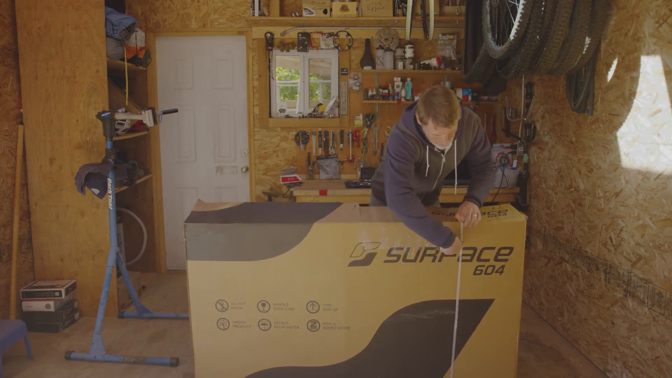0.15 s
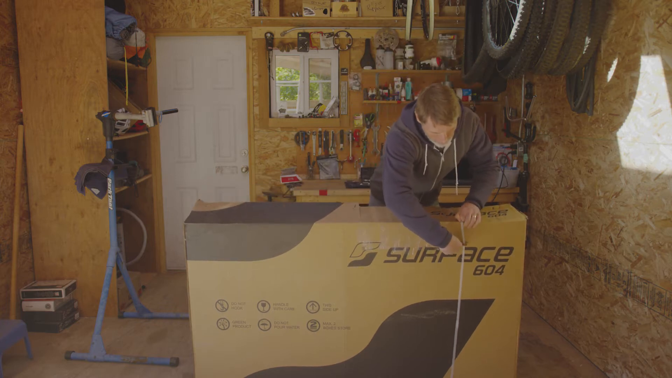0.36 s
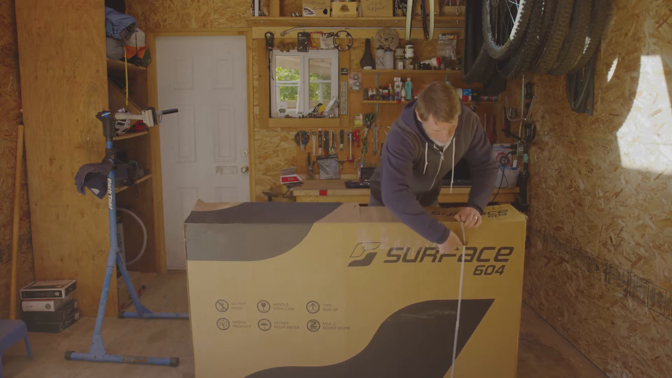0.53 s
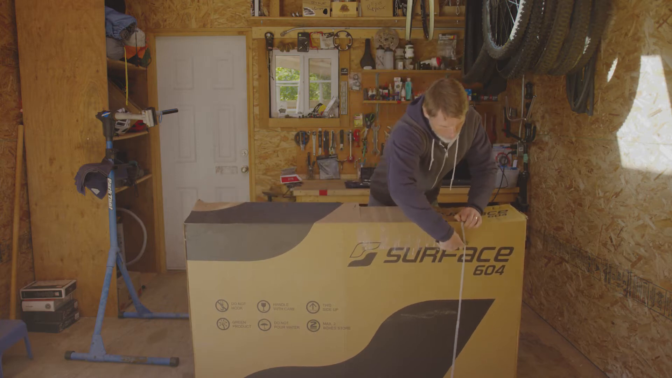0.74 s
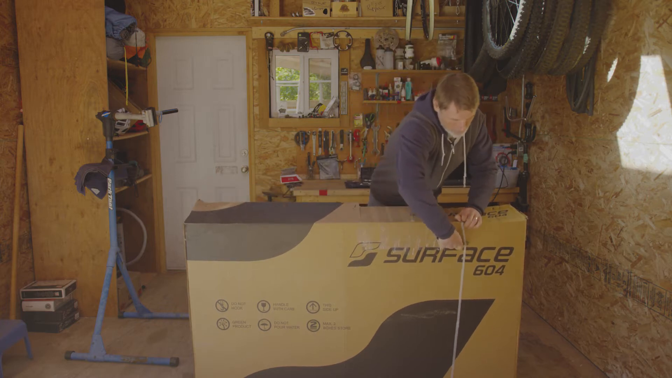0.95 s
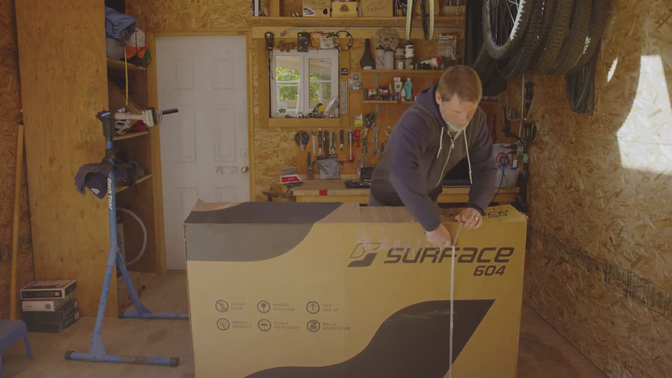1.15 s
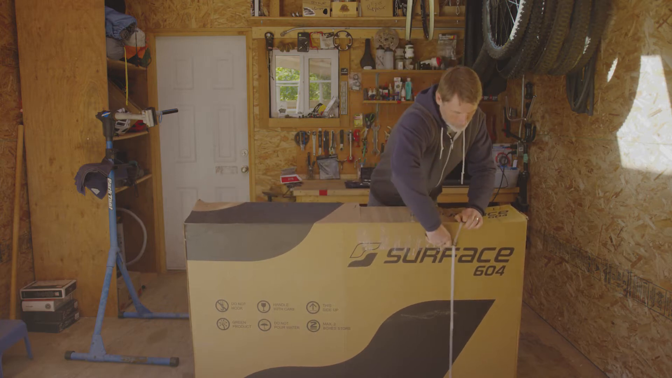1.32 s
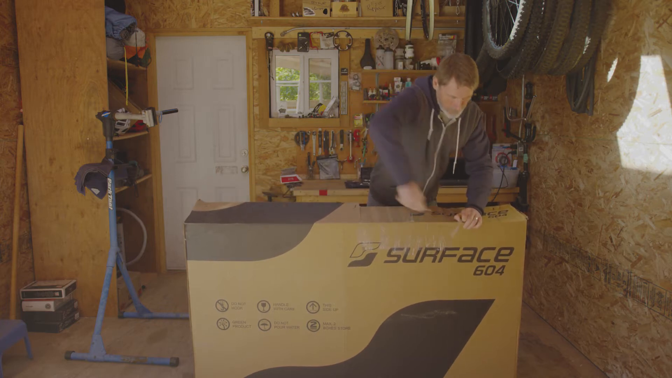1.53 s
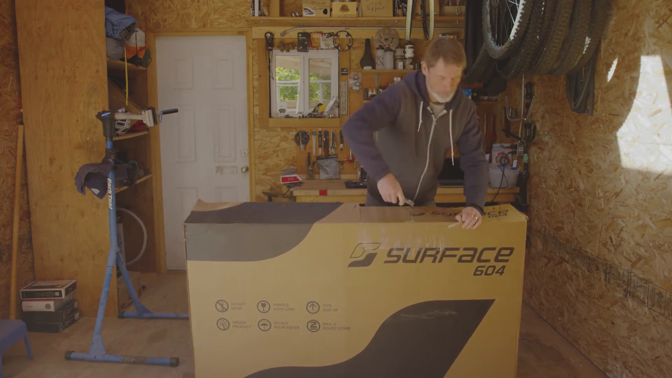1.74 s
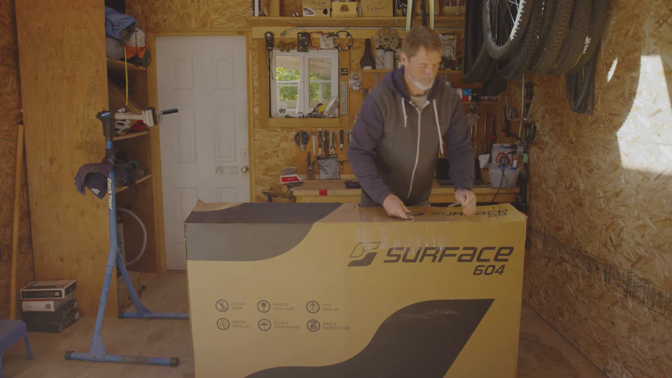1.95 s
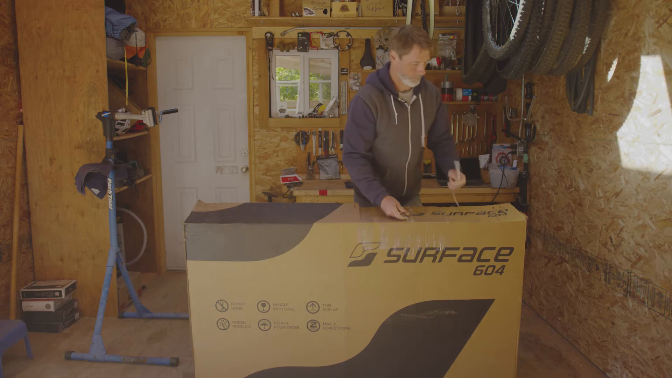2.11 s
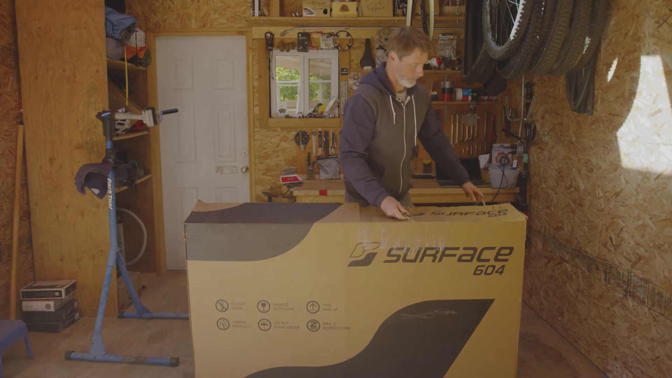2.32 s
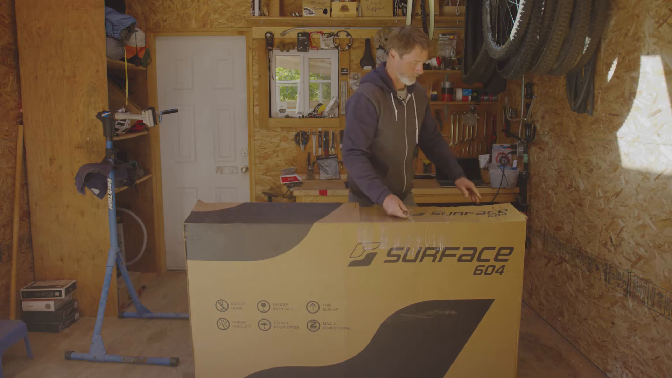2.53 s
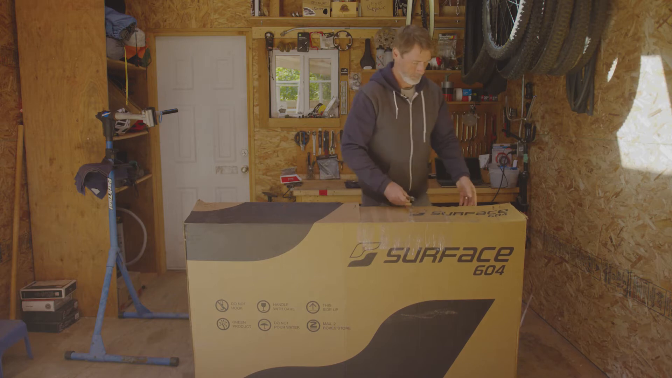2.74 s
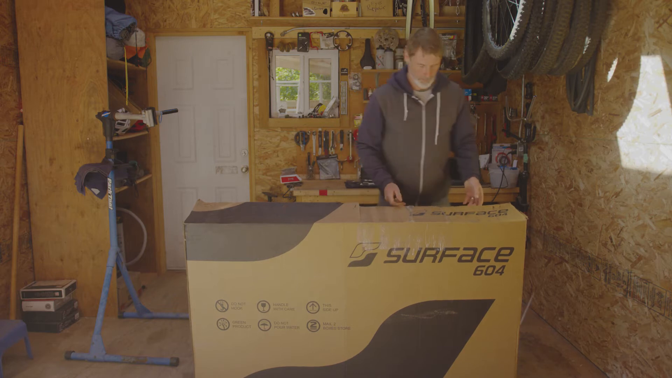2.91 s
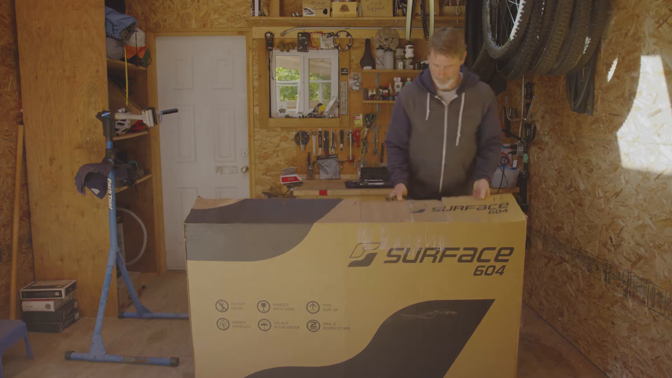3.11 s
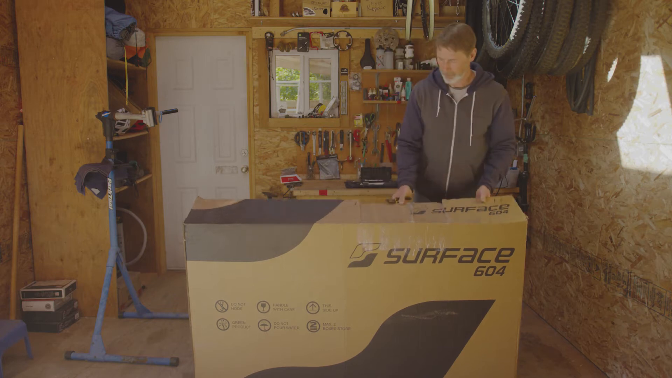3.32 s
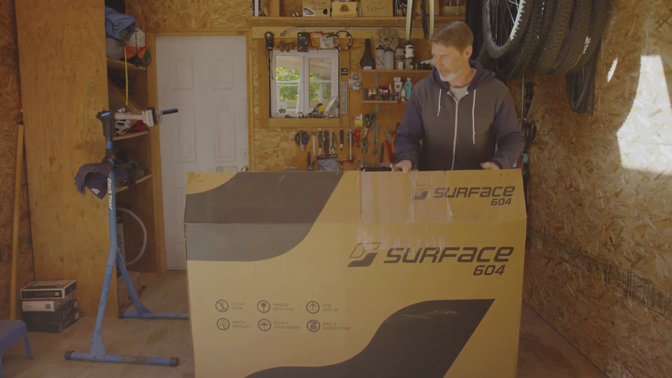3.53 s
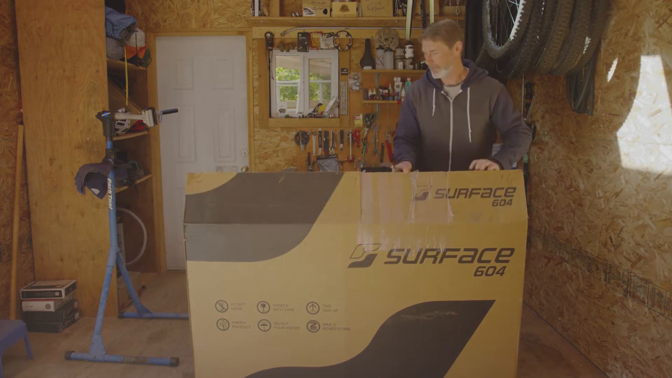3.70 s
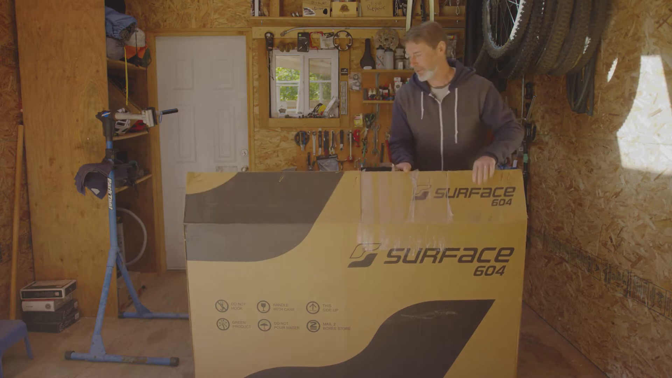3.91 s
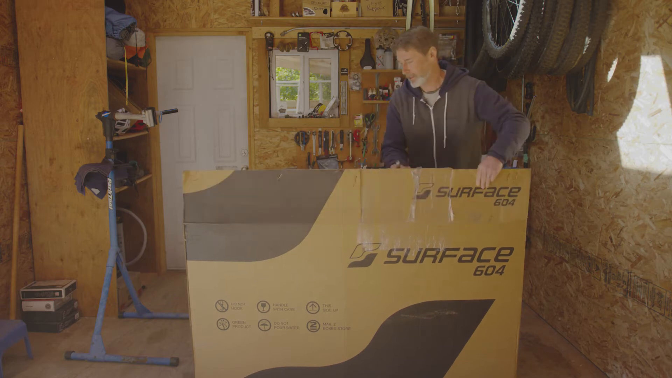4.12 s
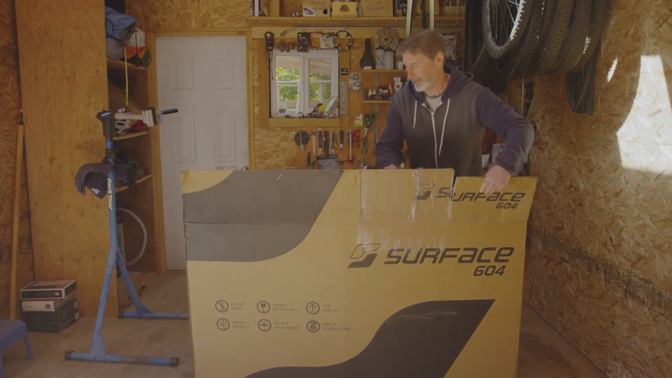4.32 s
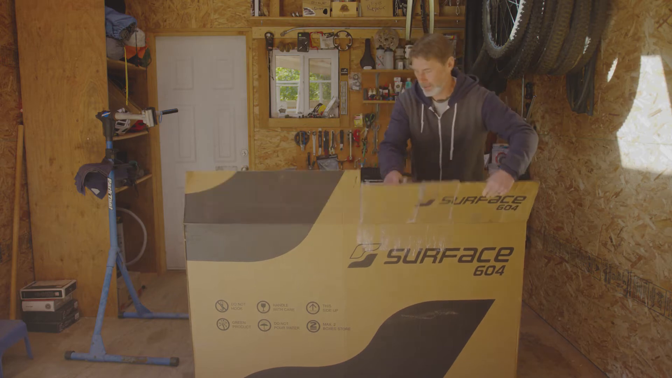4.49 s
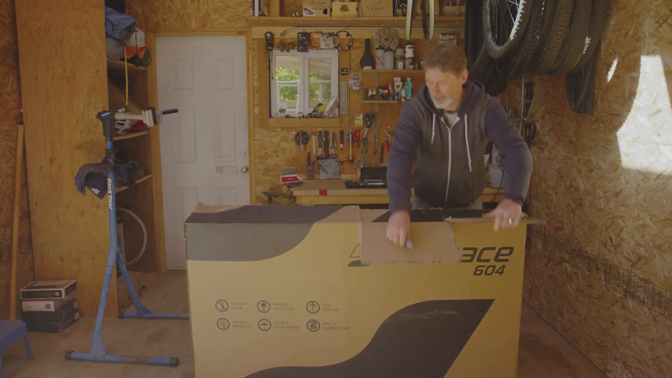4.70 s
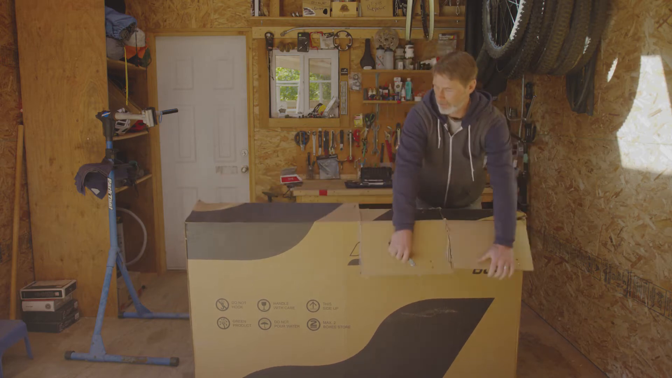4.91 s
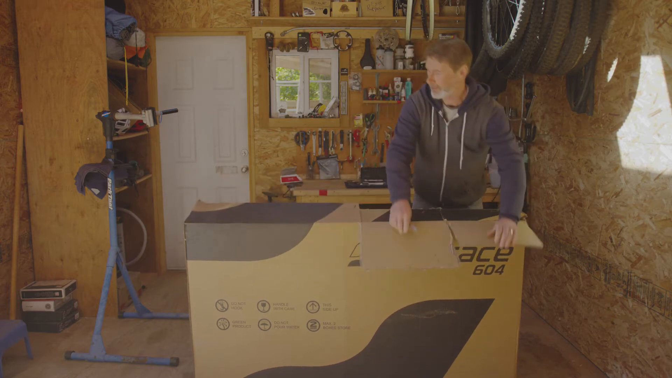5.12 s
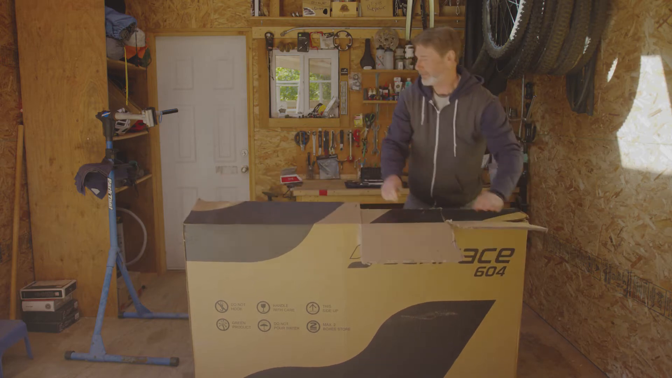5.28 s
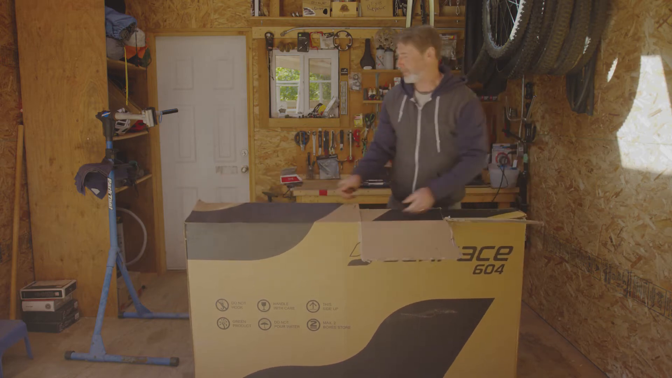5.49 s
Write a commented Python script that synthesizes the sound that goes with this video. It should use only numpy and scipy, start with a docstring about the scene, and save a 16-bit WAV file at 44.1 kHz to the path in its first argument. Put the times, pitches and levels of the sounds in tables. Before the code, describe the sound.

Close in a small wooden workshop, hands bump a large hollow cardboard box and steel snips click faintly. One bright snip, then the tight plastic strap lets go with a sharp crack, hollow thud and short hiss. After light rustling, tape and card rip in crackling bursts, and flaps are slapped open with papery knocks. Short room tail, quiet low room tone.

```python
"""A big hollow cardboard box is knocked and torn open by hand, heard close in a small wooden workshop.
Every knock rings the damped modes of the box; noise bursts make the cracks of strap, tape and card edge.
Snips click on short steel modes as they cut the tight plastic strap, which cracks and whips away.
Sliding and scraping are grainy or smooth noise, coloured and partly fed into the box.
Blows, cracks and clicks stir a short room tail; a quiet room tone lies under it all."""
import sys
import numpy as np
from scipy import signal
from scipy.fft import rfft, irfft, next_fast_len
from scipy.io import wavfile
from scipy.ndimage import uniform_filter1d

SR = 44100
rng = np.random.default_rng(int(sys.argv[2]) if len(sys.argv) > 2 else 0)


def natural_amplitude(level_db):
    """Convert a level in decibels to a linear amplitude factor, elementwise."""
    exponent = np.asarray(level_db, float) / 20
    return 10 ** exponent


def materialize(psi):
    """Save the field psi as 16-bit PCM at rate SR to the path in sys.argv[1].

    A 1-D psi becomes a single channel; in a 2-D psi each row is a channel.
    """
    bounded = np.clip(np.atleast_2d(psi).T, -1, 1)
    quanta = np.round(bounded * 32767).astype(np.int16)
    wavfile.write(sys.argv[1], SR, quanta)


N = 244742

# Modes of the hollow box. Each row: pitch in Hz, gain in dB, time to fall by 60 dB in seconds.
BOX_MODES = [(81.5, -18, 0.11), (113, 1, 0.082), (163.5, -3, 0.089), (215, -6.5, 0.083),
             (254.4, -1.5, 0.084), (303, 2.5, 0.035), (381.8, -0.5, 0.059), (456.6, 2.5, 0.033),
             (542.5, 1, 0.042), (612, 2, 0.035), (695.4, 6, 0.034), (780, 0, 0.04), (842, 1.5, 0.015),
             (920, 2, 0.017), (1072, 0.5, 0.028), (1250, 2, 0.016), (1545, -2.5, 0.014),
             (1870, -9.5, 0.012)]
# Spectrum of rubbed card. Each row: frequency in Hz, relative density in dB per Hz.
CARD_SPECTRUM = [(410, -32.5), (700, -30.5), (852, -2.5), (1680, -7.5), (4150, 0.5), (4990, -7),
                 (7790, -1.5), (14400, -4.5), (16000, -17.5)]


def unit(x):
    """Scale to rms 1."""
    return x / np.sqrt(np.mean(x ** 2))


def colour(x, points):
    """Filter by an outline of (Hz, dB) points, joined along log frequency."""
    hz, db = np.transpose(points)
    size = next_fast_len(len(x))
    f = np.maximum(np.fft.rfftfreq(size, 1 / SR), 1)
    gain = natural_amplitude(np.interp(np.log(f), np.log(hz), db))
    return irfft(rfft(x, size) * gain, size)[:len(x)]


def band(x, hz, octaves):
    """Band-pass of the given width round hz, scaled to rms 1."""
    half = 2 ** (octaves / 2)
    edges = np.clip([hz / half, hz * half], 20, .45 * SR)
    return unit(signal.sosfilt(signal.butter(2, edges, "band", fs=SR, output="sos"), x))


def ring(x, hz, t60):
    """One damped mode driven by x, falling 60 dB in t60 seconds."""
    pole = np.exp(2j * np.pi * hz / SR - np.log(1000) / (t60 * SR))
    return signal.lfilter([1], [1, -pole], x).imag


def walk(rate):
    """Random levels of spread 1, gliding to a new one every 1 / rate seconds."""
    hold = int(SR / rate)
    steps = np.repeat(rng.standard_normal(N // hold + 1), hold)
    return unit(uniform_filter1d(steps, hold)[:N])


def add(out, s, x):
    """Mix a sound in at time s."""
    i = int(s * SR)
    out[i:i + len(x)] += x[:N - i]


def grains(rate, spread_db):
    """Stick-slip ticks of very uneven size, each a millisecond puff of noise, over steady friction noise."""
    size_db = spread_db * np.minimum(rng.exponential(size=N), 3.5)
    ticks = (rng.random(N) < rate / SR) * natural_amplitude(size_db)
    puffs = signal.lfilter([1], [1, -np.exp(-1 / (.0012 * SR))], ticks)
    return (unit(puffs) + 1.3) * rng.standard_normal(N)


def shaken_box(spread_db):
    """The box modes fed by rough, continuous contact; light rubbing hardly moves the largest walls."""
    shake = grains(250., spread_db)
    hum = np.zeros(N)
    for hz, gain_db, t60 in BOX_MODES:
        tilt_db = -7.0 * abs(np.log2(hz / 230))  # modes away from 230 Hz are weaker
        hum += natural_amplitude(gain_db + tilt_db + 4.7 * walk(15)) * unit(ring(shake, hz, t60))
    return unit(signal.sosfilt(signal.butter(2, 90, "high", fs=SR, output="sos"), hum))


def knocks():
    """A short push and a fading rattle ring the modes near the struck panel; soft blows skip high ones."""
    # Each row: start in seconds, peak in dB, pitch of the struck panel in Hz,
    # softness in dB lost per octave above that pitch.
    blow_table = [(0.0, -30.5, 241, 6.5), (0.136, -48.5, 221, 10), (0.191, -51.5, 226, 9),
                  (0.488, -43.5, 716, 32), (0.815, -43.5, 260, 11), (0.852, -37.5, 283, 9),
                  (0.945, -42, 238, 8), (1.077, -43, 117, 15), (1.103, -41, 130, 9), (1.166, -34.5, 228, 8),
                  (1.284, -44, 220, 34), (1.475, -29.5, 300, 1), (1.483, -27.5, 303, 4),
                  (1.491, -17.5, 215, 10.5), (1.4923, -14.5, 520, 7), (1.974, -25, 260, 23),
                  (3.133, -32.5, 113, 7), (3.336, -38.5, 215, 26), (3.366, -38.5, 106, 10),
                  (3.455, -42, 133, 14.5), (3.64, -39.5, 390, 21), (3.723, -39.5, 143, 7),
                  (3.755, -43, 131, 11.5), (4.148, -38, 161, 1), (4.452, -32.5, 174, 9.5),
                  (4.466, -29.5, 113, 19), (4.572, -34, 254, 16), (4.581, -23, 284, 2.5),
                  (4.781, -35.5, 425, 42), (4.878, -16, 540, -3)]
    rattle_ms = 7.6  # decay constant of the loose card
    out, t = np.zeros(N), np.arange(SR // 3) / SR
    mode_hz = np.transpose(BOX_MODES)[0]
    for s, db, panel_hz, soft_db in blow_table:
        push = np.sin(np.pi * np.clip(t * 3 * panel_hz, 0, 1)) ** 2
        rattle = 1.41 * rng.standard_normal(len(t)) * np.exp(-1000 * t / rattle_ms)
        above = np.log2(mode_hz / panel_hz)
        spot_db = 1.5 * rng.standard_normal(len(BOX_MODES))  # each blow lands somewhere new
        reach_db = spot_db - np.maximum(soft_db * above, -11 * above)
        body = np.zeros(len(t))
        for (hz, gain_db, t60), r in zip(BOX_MODES, reach_db):
            body += natural_amplitude(gain_db + r) * ring(push + rattle, hz, t60)
        # a wall radiates poorly below its own pitch, and soft contact carries no treble
        octaves_up = np.clip(24 / max(soft_db, 1), .8, 4)
        edges = [0.59 * panel_hz, panel_hz * 2 ** octaves_up]
        body = signal.sosfilt(signal.butter(2, edges, "band", fs=SR, output="sos"), body)
        add(out, s, natural_amplitude(db) * body / np.abs(body).max())
    return out


def room(x):
    """What the wooden walls return: a dense noise tail whose treble outlasts its bass."""
    low_t60, high_t60, wet_db = 0.17, 0.29, -6.5  # seconds, seconds, dB
    t = np.arange(SR // 2) / SR
    noise = rng.standard_normal(len(t))
    low = signal.sosfilt(signal.butter(1, 1500, fs=SR, output="sos"), noise)
    tail = low * natural_amplitude(-60 * t / low_t60) + (noise - low) * natural_amplitude(-60 * t / high_t60)
    tail = tail * np.clip((t - .004) / 0.0056, 0, 1)  # silent for 4 ms, then builds over 5.6 ms
    tail = tail / np.sqrt(np.sum(tail ** 2))
    return natural_amplitude(wet_db) * signal.fftconvolve(x, tail)[:N]


def sliding():
    """Hands rubbing lightly rustle in the card, with a separately weighted hiss, and shake the whole box."""
    # Each row: time in seconds, rustle in dB before its top end is weighted, rumble of the box in dB.
    slide_table = [(0.0, -68, -61.5), (0.23, -82.5, -71), (0.77, -89, -65.5), (1.0, -80, -60),
                   (1.41, -80, -69), (1.65, -70, -59), (2.13, -69.5, -69), (2.56, -88, -71),
                   (3.01, -68, -60), (3.52, -60, -60), (3.8, -77, -71), (4.2, -52.5, -53.5),
                   (4.42, -72, -63.5), (4.64, -64, -53.5), (4.98, -62, -62.5), (5.25, -71, -61.5),
                   (5.55, -84.5, -84.5)]
    top_even_db, top_lag = -77.5, 0.7  # rustle dB where the top end is unaltered; dB it lags per dB
    s, *columns = np.transpose(slide_table)
    rustle_db, rumble_db = (np.interp(np.arange(N) / SR, s, c) for c in columns)
    top_db = top_lag * (top_even_db - rustle_db)  # harder rubbing adds body more than hiss
    card = unit(colour(grains(610.0, 6.8), CARD_SPECTRUM) * natural_amplitude(4.5 * walk(30)))
    top = signal.sosfiltfilt(signal.butter(1, 6000, "high", fs=SR, output="sos"), card)
    rustle = card - top + natural_amplitude(top_db) * top
    rumble = unit(shaken_box(2.2) * natural_amplitude(2.5 * walk(25)))
    return natural_amplitude(rustle_db) * rustle + natural_amplitude(rumble_db) * rumble


def room_tone():
    """Low murmur of the building and faint hiss: coloured noise, its level wavering a little."""
    # Each row: frequency in Hz, relative density in dB per Hz.
    tone_spectrum = [(15, -35), (25, 9), (229, -9), (301, -23), (363, -14.5), (1260, -29.5), (1440, -32),
                     (1700, -27), (2220, -35), (11000, -41), (16000, -40)]
    level_db = -62 + 0.52 * walk(4.1)
    return natural_amplitude(level_db) * unit(colour(rng.standard_normal(N), tone_spectrum))


def scrapes():
    """Rubbing noise that swells and dies: gritty on card, high and smooth on strap, a rush under flaps."""
    # Smooth drags of strap and sleeve. Each row: peak time in seconds, hiss in dB rms at the peak,
    # rise constant in ms, fall constant in ms, box in dB against the hiss.
    drag_table = [(0.413, -66.5, 39, 48, 11.5), (1.104, -54, 36, 38, 7), (1.493, -31, 3.7, 30.2, 4),
                  (1.574, -42.5, 18, 35.3, -12), (2.015, -63, 23, 9.6, -16), (2.452, -62.5, 1.3, 15, -2),
                  (5.17, -63.5, 94, 84, -11)]
    # Gritty scrapes of card on card. Each row: peak time in seconds, hiss in dB rms at the peak,
    # rise constant in ms, fall constant in ms, box in dB against the hiss.
    scuff_table = [(3.132, -51, 17.7, 33, 12), (3.389, -56, 5, 22, 8), (3.5, -59, 6, 37, -3),
                   (3.59, -62, 25, 84, -1), (3.665, -71.5, 6.6, 35, 16.5), (3.738, -73, 23, 54, 16.5),
                   (4.139, -56, 17, 29, -10), (4.198, -42.5, 5.6, 52.4, 2), (4.352, -53.5, 10, 42, -2),
                   (4.7, -61.5, 38, 44, 12.5), (4.8, -58.5, 20, 99, 7.5)]
    # Air and dust rushing from under a slapped flap. Each row: peak time in seconds,
    # hiss in dB rms at the peak, box in dB against the hiss.
    slap_table = [(4.466, -39, 10), (4.572, -37.5, 7), (4.884, -38, -3)]
    drag_hz, scuff_hz, slap_hz = 10500, 4400, 4810  # centres of the octave-wide band
    slap_rise_ms, slap_fall_ms = 4.4, 39.2
    out, t = np.zeros(N), np.arange(N) / SR
    crackle = unit(colour(grains(400., 4.), CARD_SPECTRUM))
    box = shaken_box(1.5)
    smooth = rng.standard_normal(N)
    rows = [(*row, drag_hz, smooth) for row in drag_table]
    rows += [(*row, scuff_hz, crackle) for row in scuff_table]
    rows += [(s, db, slap_rise_ms, slap_fall_ms, box_db, slap_hz, smooth) for s, db, box_db in slap_table]
    for s, db, rise_ms, fall_ms, box_db, hz, rub in rows:
        part = slice(int((s - .2) * SR), int((s + .4) * SR))
        late_ms = 1000 * (t[part] - s)
        swell = np.exp(np.minimum(late_ms / rise_ms, -late_ms / fall_ms))
        hiss = band(rub[part], hz, 1.0) + 2.0 * band(rub[part], 3900.0, 3.7)
        out[part] += natural_amplitude(db) * swell * (unit(hiss) + natural_amplitude(box_db) * box[part])
    return out


def snips():
    """The snips click at blade and pivot: a millisecond of contact rings the short steel modes."""
    # Each row: start in seconds, peak in dB, shift in dB of the modes above 6 kHz.
    click_table = [(0.416, -33, 7.5), (0.49, -42.5, -6), (0.504, -47.5, 5), (0.6766, -45.5, -9),
                   (0.719, -55.5, 4), (0.8643, -47.5, 2.5), (0.944, -28, -33), (1.1065, -19, 5)]
    # Modes of the steel. Each row: pitch in Hz, level in dB before that shift, 60 dB decay in seconds.
    steel_modes = [(2900, -11, .0022), (4800, 0, .003), (8000, -2, .002), (11900, 0, .002)]
    out, t = np.zeros(N), np.arange(SR // 20) / SR
    for s, db, upper_db in click_table:
        touch = rng.standard_normal(len(t)) * np.exp(-1000 * t / 1.1)
        jolt = np.diff(touch, prepend=0)
        click = np.zeros(len(t))
        for hz, mode_db, t60 in steel_modes:
            shift_db = upper_db if hz > 6000 else 0
            click += natural_amplitude(mode_db + shift_db) * unit(ring(jolt, hz, t60))
        add(out, s, natural_amplitude(db) * click / np.abs(click).max())
    return out


def cracks():
    """A sharp burst: part rings the small thing that snapped, part is broad; the box top sends it again."""
    # Cracks of strap, tape and card edge. Each row: start in seconds, peak in dB, ring in Hz.
    crack_table = [(1.105, -34.5, 1480), (1.285, -53, 9200), (1.4914, -22.5, 1800), (1.497, -15.5, 4640),
                   (1.5627, -29, 4340), (2.0137, -41, 9500), (2.148, -48.5, 7000), (2.449, -42, 9400),
                   (2.7242, -47, 4360), (3.04, -42.5, 3220), (3.1195, -31.5, 3340), (3.133, -33.5, 810),
                   (3.1467, -27.5, 3100), (3.1579, -26.5, 3900), (3.367, -43, 800), (3.384, -34, 2950),
                   (3.4062, -29.5, 3400), (3.4878, -41.5, 2630), (3.516, -40, 3500), (3.563, -46.5, 1490),
                   (3.8104, -40, 3650), (3.9837, -45.5, 6400), (4.034, -47, 1210), (4.296, -43, 4400),
                   (4.1264, -35, 3080), (4.1767, -28, 2400), (4.198, -30, 1430), (4.2096, -29, 2510),
                   (4.2554, -32, 7800), (4.338, -36.5, 2020), (4.3712, -34.5, 4400), (4.4663, -27, 7350),
                   (4.5705, -16, 7040), (4.582, -20, 3700), (4.8579, -32, 1790), (4.8762, -17.5, 2860)]
    snap_ms, fizz_ms = 0.63, 2.7  # decay constants
    out, t = np.zeros(N), np.arange(SR // 8) / SR
    for s, db, hz in crack_table + tearing():
        fade = np.exp(-1000 * t / snap_ms) + .5 * np.exp(-1000 * t / fizz_ms)
        burst = rng.standard_normal(len(t)) * fade
        snap = band(burst, hz, 0.95) + 0.63 * band(burst, 4600.0, 3.5)
        snap = snap + 0.17 * np.roll(snap, int(.0021 * SR))  # returned 2.1 ms later
        add(out, s, natural_amplitude(db) * snap / np.abs(snap).max())
    return out


def tearing():
    """Tape and fibres tear as rows of small cracks at uneven gaps, each with its own size and ring."""
    # Each row: start in seconds, end in seconds, typical peak in dB, typical ring in Hz.
    tear_table = [(3.1, 3.2, -41, 2500), (3.26, 3.36, -50, 3500), (3.42, 3.62, -46, 2600),
                  (3.96, 4.06, -50, 4500), (4.13, 4.3, -42, 3800), (4.335, 4.405, -38, 4400)]
    gap_ms, spread_db, spread_octaves = 9, 4.0, 0.25  # median gap, spreads of size and ring
    rows = []
    for start, end, db, hz in tear_table:
        gap, size, pitch = rng.standard_normal((60, 3)).T
        times = start + np.cumsum(gap_ms / 1000 * np.exp(.6 * gap))
        levels_db = db + spread_db * size
        rings_hz = hz * 2 ** (spread_octaves * pitch)
        rows += [row for row in zip(times, levels_db, rings_hz) if row[0] < end]
    return rows


def scene():
    """Blows, cracks and clicks ring in the room over scraping, sliding and room tone."""
    blows, snaps, steel = knocks(), cracks(), snips()
    # small close clicks stir the room less than blows on the box
    walls = room(blows + natural_amplitude(-3) * snaps + natural_amplitude(-13) * steel)
    return (blows + snaps + steel + walls + scrapes() + sliding() + room_tone())[None]


def roll_off(x):
    """The treble ends steeply here."""
    return signal.sosfilt(signal.butter(12, 16470, fs=SR, output="sos"), x)


def record(dry):
    """A small microphone that loses the deepest bass, below about 50 Hz."""
    mic = signal.sosfilt(signal.butter(3, 50, "high", fs=SR, output="sos"), dry)
    return roll_off(mic)


dry = scene()
out = record(dry)
materialize(out)
```